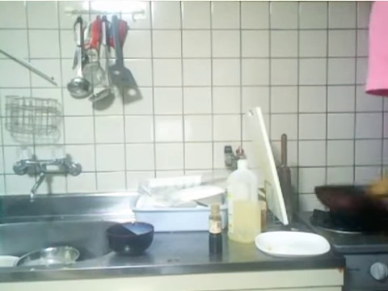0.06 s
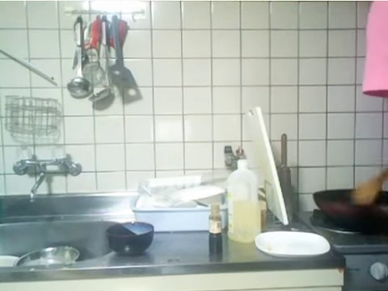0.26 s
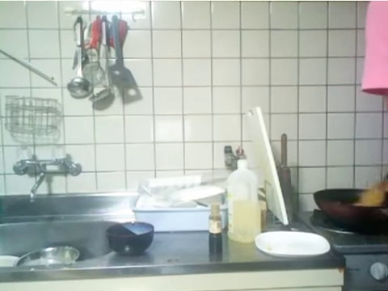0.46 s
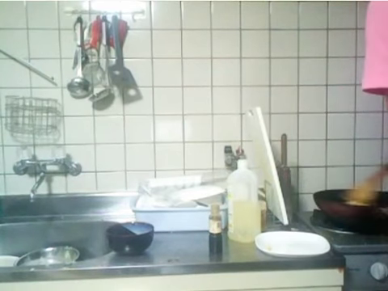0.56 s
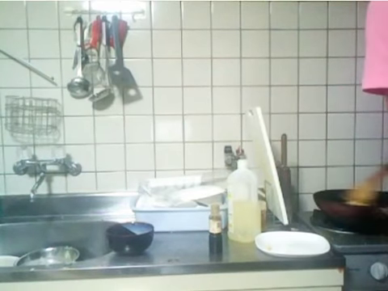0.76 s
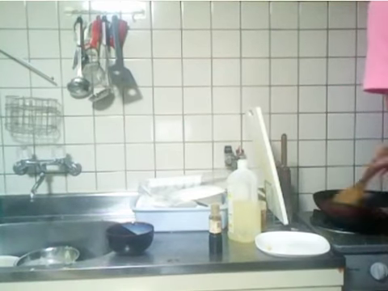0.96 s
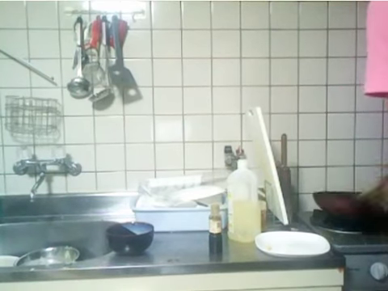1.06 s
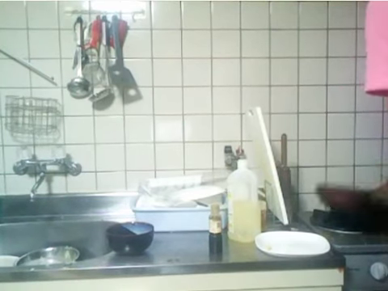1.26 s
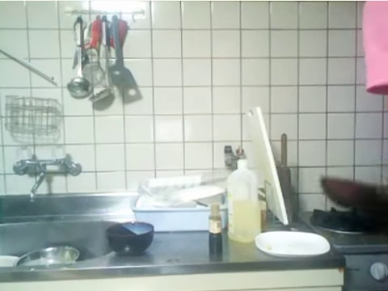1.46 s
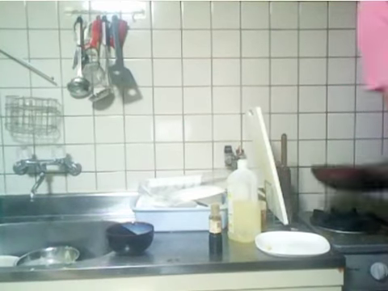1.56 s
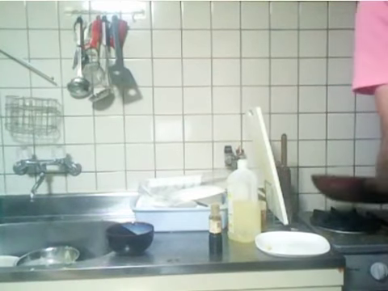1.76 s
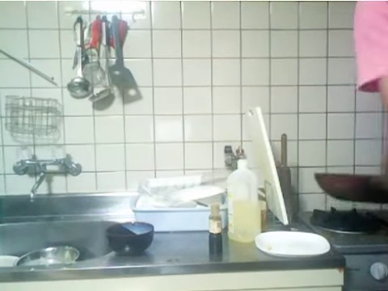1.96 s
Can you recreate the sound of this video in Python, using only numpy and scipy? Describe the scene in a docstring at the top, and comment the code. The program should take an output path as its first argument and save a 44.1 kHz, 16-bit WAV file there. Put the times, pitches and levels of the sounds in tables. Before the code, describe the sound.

A frying pan lands on a gas stove grate with a loud, ringing clatter. A wooden spatula taps and scrapes faintly, then the grate clicks as the pan lifts. A fan hums throughout the small kitchen, heard from a distance.

```python
"""Frying pan on a gas stove

A small tiled kitchen, one microphone, far enough from the stove that the room outweighs the direct sound.
A pan lands on the iron grate and rings as it rocks into place; the stove shudders under it. A wooden
spatula taps, scrapes and squeaks once, and the grate clicks as the pan is lifted off again.
A steady low hum, like that of an extractor fan, fills the room."""
import sys
import numpy as np
from scipy import signal
from scipy.fft import rfft, irfft, next_fast_len
from scipy.io import wavfile

SR = 44100
rng = np.random.default_rng(int(sys.argv[2]) if len(sys.argv) > 2 else 0)


def generate_wav(sig):
    """Save sig (samples, or channels by samples) to the path in sys.argv[1] as 16-bit PCM at SR."""
    pcm = np.round(np.clip(np.atleast_2d(sig).T, -1, 1) * 32767).astype(np.int16)
    wavfile.write(sys.argv[1], SR, pcm)


N = 90404
TIME = np.arange(N) / SR
RING_SAMPLES = 2 ** 15   # length of one blow's ring and of the room's response
# modes of the pan: pitch_hz, level_db, t60_s
PAN_MODES = [(256, -52, 0.25), (313.4, -46.5, 0.15), (424.7, -44, 0.17), (500, -56, 0.23), (739, -49, 0.19),
             (1272, -43.5, .12), (1580, -45, 0.12), (1833, -50, 0.1), (2085, -48, 0.16),
             (2778, -43.5, 0.069), (3030, -52.5, .1), (3580, -58.5, 0.14), (4100, -50, 0.049),
             (5430, -52.5, 0.092)]


def pan():
    """The pan lands on the grate and rocks; each contact cracks and sets it ringing."""
    # contacts: start_s, level_db, brightness_hz, bass_cut_hz
    knocks = [(0.2424, 12.5, 14400, 694), (0.2480, 13, 7500, 640), (0.2598, 9.5, 6540, 250),
              (0.2645, 5.5, 3970, 200), (0.2774, 13.5, 1010, 80.4), (0.3334, 2, 7040, 250),
              (0.3395, 5, 5400, 248), (0.3500, 2.5, 2460, 600), (0.3625, 6.5, 1960, 800)]
    # crack of metal on iron: frequency_hz, level_db
    crack = [(50, 1.5), (195, -2.5), (290, 11), (600, 1), (760, 5), (950, -1), (1250, 5), (2000, 4),
             (3200, 2.5), (6000, -5.5), (8000, -13.5), (10500, -39), (14000, -15), (16000, -12)]
    return blows(knocks, crack, PAN_MODES)


def spatula_taps():
    """Wood knocks on the pan and rings its modes."""
    # contacts: start_s, level_db, brightness_hz, bass_cut_hz
    taps = [(0.633, -27, 7000, 2500), (0.648, -22, 4000, 2500), (0.7450, -15.5, 1270, 600),
            (0.8254, -15, 3300, 1100), (0.838, -14, 1720, 100), (0.861, -13.5, 710, 100),
            (1.137, -27, 6000, 500), (1.6105, -13, 1900, 1390)]
    # knock of wood on metal: frequency_hz, level_db
    wood = [(60, -15), (180, 7.5), (430, 19), (850, 2), (1400, 11), (2500, -2), (3400, -4.5), (7000, -5),
            (14000, -16)]
    return blows(taps, wood, PAN_MODES)


def spatula_scrape():
    """The spatula drags over the pan in a dense run of tiny slips."""
    # strength of the rubbing: time_s, level_db
    rub_levels = [(0, -46.5), (.05, -70), (.11, -72.5), (.55, -59.5), (.65, -62.5), (.98, -66), (1.11, -67),
                  (1.17, -50.5), (1.2, -37), (1.225, -50.5), (1.255, -44), (1.28, -69), (1.42, -59.5),
                  (1.46, -67), (1.78, -67.5), (1.9, -63.5), (2.05, -78)]
    # spectrum of a slip: frequency_hz, level_db
    rub_colour = [(100, -42), (400, 5), (1000, 3.5), (2000, 0.5), (3100, -4), (5200, -8), (7500, -14.5),
                  (10500, -48.5), (14000, -50), (16000, -14)]
    # resonances of the spatula pressed on the pan: pitch_hz, level_db, t60_s
    rub_modes = [(777, -39, 0.06), (1252, -38, .08), (1726, -40.5, 0.032), (2405, -38.5, 0.05),
                 (3575, -39, 0.016), (4850, -39, 0.029)]
    slips_per_s, spread_db = 600, 4
    sizes = from_db(spread_db * np.minimum(rng.exponential(1, N), 4)) * rng.choice([-1, 1], N)
    slips = sizes * (rng.random(N) < slips_per_s / SR)
    strength = from_db(np.interp(TIME, *np.transpose(rub_levels)))
    steady_rms = np.std(body(slips, rub_colour, rub_modes))
    return body(slips * strength, rub_colour, rub_modes) / steady_rms


def spatula_squeak():
    """At the end of the stroke the slips lock into a brief, rough, falling tone."""
    start_s, length_s, level_db = 1.238, 0.042, -42.5
    start_hz, end_hz, jitter = 2027, 1740, 0.065
    progress = np.clip((TIME - start_s) / length_s, 0, 1)
    hz = (start_hz + (end_hz - start_hz) * progress) * (1 + jitter * drift(rate_hz=685))
    swell = np.sqrt(np.abs(np.sin(np.pi * np.sqrt(progress))))
    return from_db(level_db) * swell * np.sqrt(2) * np.sin(2 * np.pi * np.cumsum(hz) / SR)


def grate():
    """The iron grate clicks and rings as the pan is lifted off."""
    # contacts: start_s, level_db, brightness_hz, bass_cut_hz
    grate_clicks = [(1.485, -25.5, 8000, 300), (1.5068, -11.5, 14000, 694), (1.5105, -7, 11100, 300),
                    (1.669, -20.5, 8000, 200), (1.695, -20, 1500, 200), (1.9994, -29, 12000, 1500)]
    # spectrum of a click: frequency_hz, level_db
    grate_tick = [(100, -8), (400, 4.5), (800, -2), (1150, 6), (1700, 6.5), (2600, -2.5), (4000, -2.5),
                  (6500, 0), (8500, -11), (11000, -29.5), (14000, -9), (16000, -10)]
    # modes of the grate: pitch_hz, level_db, t60_s
    grate_modes = [(1117, -39.5, 0.16), (1778, -37.5, 0.1), (2072, -44.5, 0.15), (3040, -47, 0.16),
                   (3570, -44.5, .1), (4480, -55, 0.068), (5580, -38, 0.068), (6100, -58, 0.063)]
    return blows(grate_clicks, grate_tick, grate_modes)


def stove():
    """The stove shudders as it takes the pan's weight: its low modes swell and die."""
    # modes of the cabinet: pitch_hz, level_db, t60_s
    stove_modes = [(58.4, -45, 0.72), (83.2, -42, 0.65), (104, -45, 0.44), (168, -37.5, 0.4)]
    start_s, rise_s = 0.27, 0.014
    t = np.maximum(TIME - start_s, 0)
    rings = sum(from_db(db) * die_away(t, t60) * np.sin(2 * np.pi * (hz * t + rng.random()))
                for hz, db, t60 in stove_modes)
    return rings * (1 - np.exp(-t / rise_s))


def fan():
    """Steady air noise with wavering hum bands."""
    # spectrum of the moving air: frequency_hz, relative_db
    air_colour = [(15, -7.5), (24, 2), (45, -4), (80, -15), (112, -15.5), (140, -16.5), (205, -23),
                  (250, -14), (300, 0), (335, -15.5), (380, -12), (470, -20), (600, -25), (730, -19.5),
                  (930, -27), (2000, -33.5), (4000, -39), (8000, -42), (11000, -50), (15500, -45.5)]
    # hum bands: pitch_hz, width_hz, level_db
    hum_bands = [(33.5, 2.43, -54.5), (61, 1.9, -79), (85.1, 2.7, -64.5), (117.7, 1.6, -71),
                 (233.7, 5.3, -66), (302.8, 12.6, -61), (370, 10.2, -62)]
    air_db, waver = -50.5, 0.4
    out = from_db(air_db) * rms_one(coloured(rng.standard_normal(N), air_colour))
    for hz, width_hz, db in hum_bands:
        wandering_hz = hz + width_hz * drift(4 * width_hz)
        phase = 2 * np.pi * (np.cumsum(wandering_hz) / SR + rng.random())
        out += from_db(db) * rms_one(np.sin(phase) * (1 + waver * drift(2 * width_hz)))
    return out


def kitchen(x):
    """At the microphone: weak direct sound, a rush of reflections from hob and tiles, then a tail."""
    # decay of the room: frequency_hz, t60_s
    room_t60 = [(100, 0.47), (400, 0.42), (1500, 0.29), (3000, 0.28), (6000, 0.32), (14000, 0.43)]
    direct_db, early_db, tail_db, tail_build_s = -17, -7, -3.5, 0.0014
    t, hz = TIME[:RING_SAMPLES], np.fft.rfftfreq(RING_SAMPLES, 1 / SR)
    white = rfft(rng.standard_normal(len(t)))
    early = from_db(early_db) * rms_one(die_away(t, t60_s=0.028))
    build = 1 - np.exp(-t / tail_build_s)
    edges_hz = np.r_[0, np.geomspace(200, 10000, 10), SR]
    response = from_db(direct_db) * signal.unit_impulse(len(t))
    for low, high in zip(edges_hz, edges_hz[1:]):
        inside = (hz >= low) & (hz < high)
        tail = from_db(tail_db) * rms_one(build * die_away(t, at_hz(room_t60, (low + high) / 2)))
        power = early ** 2 + tail ** 2
        band_rms = np.sqrt(power.mean() * inside.mean() / len(t))
        response += band_rms * rms_one(irfft(white * inside) * np.sqrt(power))
    return signal.fftconvolve(x, response)[:len(x)]


def blows(contacts, crack, modes):
    """Soft contacts are duller, glancing ones thinner; each reaches the room from a spot of its own."""
    out = np.zeros(N + RING_SAMPLES)
    struck = body(signal.unit_impulse(RING_SAMPLES), crack, modes)
    for start_s, db, brightness_hz, bass_cut_hz in contacts:
        hit = signal.lfilter(*signal.butter(2, brightness_hz, fs=SR), struck)
        hit = signal.lfilter(*signal.butter(1, bass_cut_hz, "high", fs=SR), hit)
        start = int(start_s * SR)
        out[start:start + RING_SAMPLES] += from_db(db) * kitchen(hit)
    return out[:N]


def body(force, crack, modes):
    """A struck object: a short broad crack plus its ringing modes."""
    out = coloured(force, crack)
    for hz, db, t60 in modes:
        radius = from_db(-60 / (t60 * SR))
        pole_real = radius * np.cos(2 * np.pi * hz / SR)
        ringing = signal.lfilter([1, -pole_real], [1, -2 * pole_real, radius ** 2], force + 1e-18)
        out += from_db(db) * ringing
    return out


def coloured(x, spectrum):
    """Causal (minimum-phase) filter with the given spectrum."""
    size = 2 * next_fast_len(len(x), True)
    gain = from_db(at_hz(spectrum, np.fft.rfftfreq(size, 1 / SR)))
    cepstrum = irfft(np.log(gain))
    cepstrum[1:size // 2] *= 2
    cepstrum[size // 2 + 1:] = 0
    return irfft(rfft(x, size) * np.exp(rfft(cepstrum)))[:len(x)]


def drift(rate_hz):
    """Smooth random wander of unit rms."""
    hz = np.fft.rfftfreq(N, 1 / SR)
    return rms_one(irfft(rfft(rng.standard_normal(N)) / (1 + (hz / rate_hz) ** 2) ** 2, N))


def die_away(t, t60_s):
    """Fall by 60 dB every t60_s."""
    return np.exp(-np.log(1000) * t / t60_s)


def at_hz(points, hz):
    """Read a table on a log-frequency axis."""
    points = np.array(points)
    return np.interp(np.log(hz + 1e-3), np.log(points[:, 0]), points[:, 1])


def from_db(db):
    """Decibels to gain."""
    return 10 ** (np.asarray(db) / 20)


def rms_one(x):
    """Scale to unit rms."""
    return x / np.sqrt(np.mean(x ** 2) + 1e-20)


def scene():
    """Pan, spatula and grate sound through the kitchen, over the hum and the stove's shudder."""
    landing = pan()
    spatula = spatula_taps() + kitchen(spatula_scrape() + spatula_squeak())
    return (landing + spatula + grate() + fan() + stove())[None]


def record(dry):
    """The microphone's signal is cut steeply at the top."""
    cutoff_hz = 15900
    return signal.sosfilt(signal.ellip(12, 0.1, 80, cutoff_hz, fs=SR, output="sos"), dry)


dry = scene()
out = record(dry)
generate_wav(out)
```